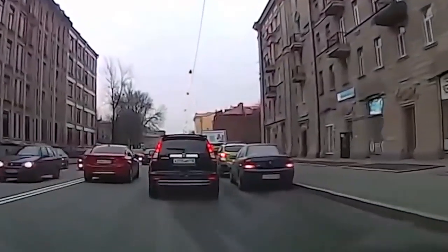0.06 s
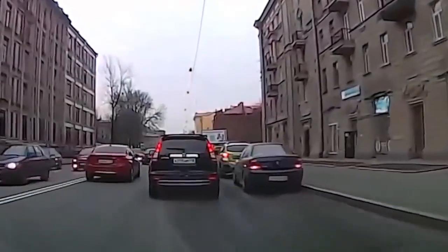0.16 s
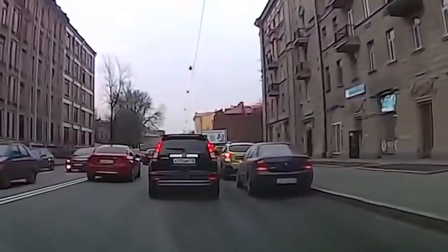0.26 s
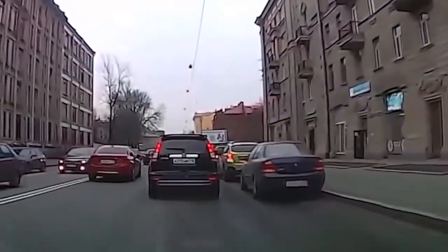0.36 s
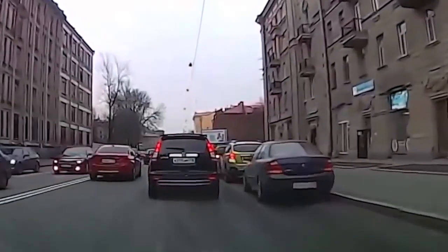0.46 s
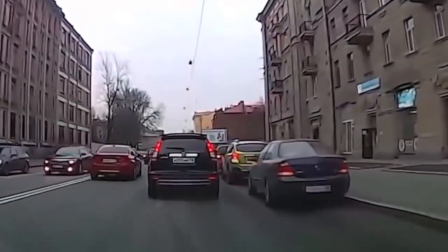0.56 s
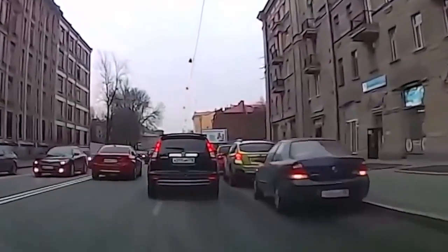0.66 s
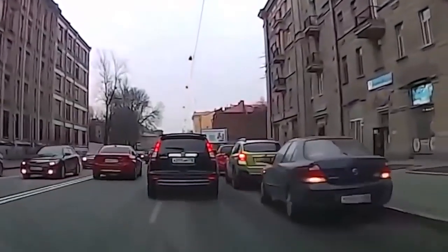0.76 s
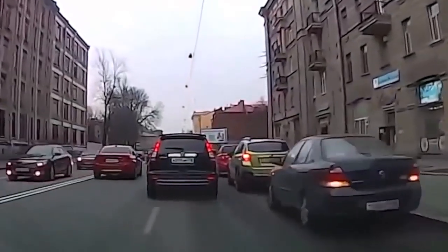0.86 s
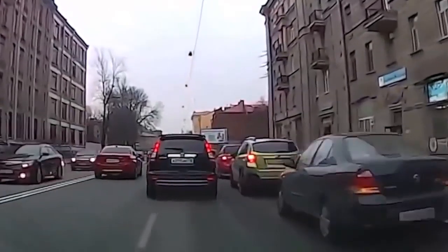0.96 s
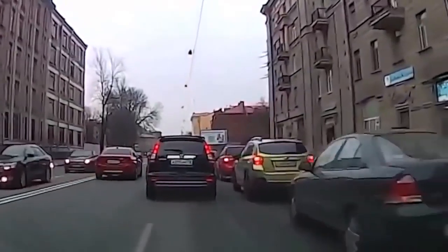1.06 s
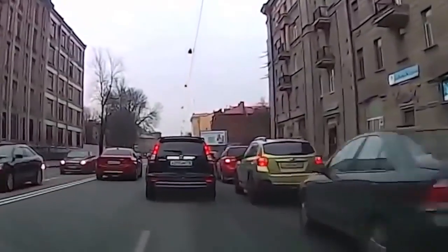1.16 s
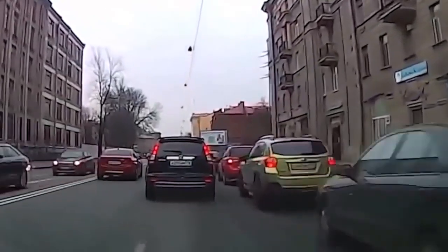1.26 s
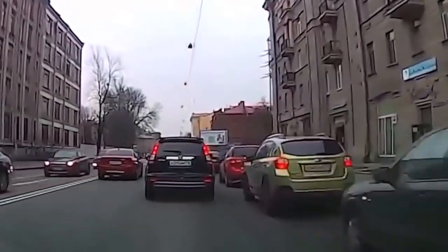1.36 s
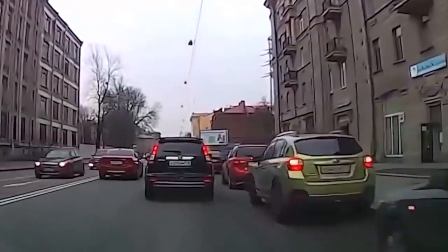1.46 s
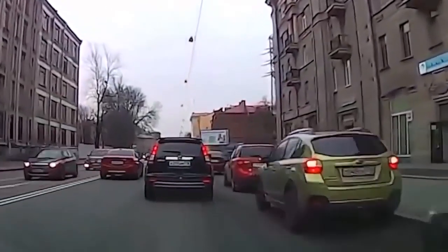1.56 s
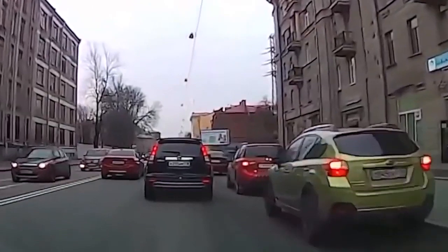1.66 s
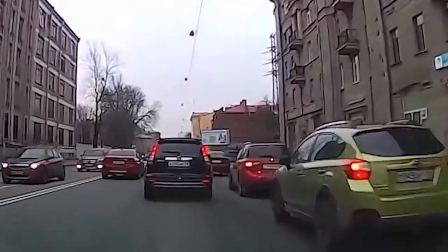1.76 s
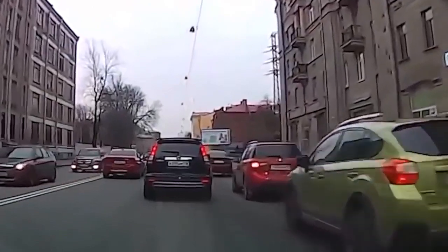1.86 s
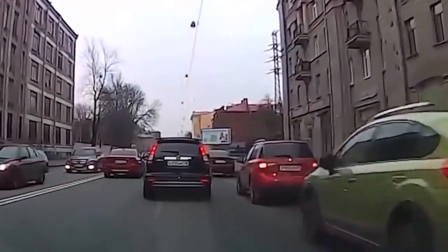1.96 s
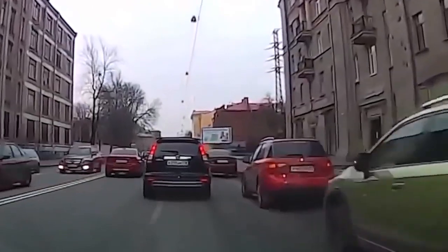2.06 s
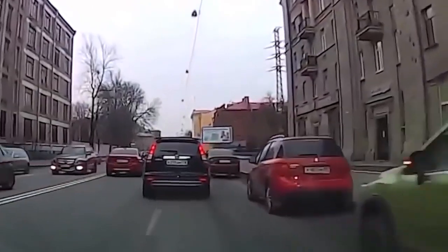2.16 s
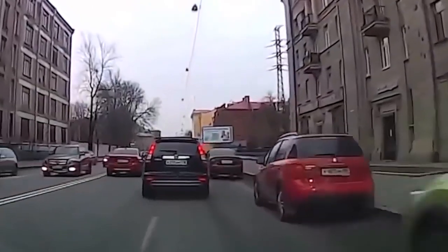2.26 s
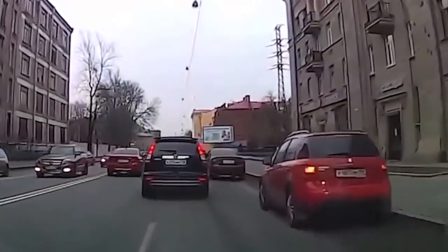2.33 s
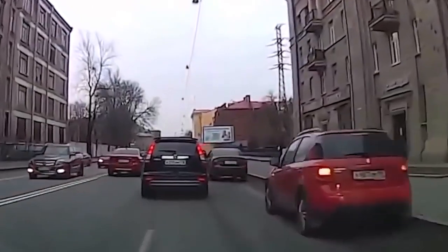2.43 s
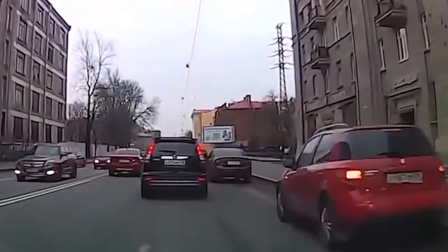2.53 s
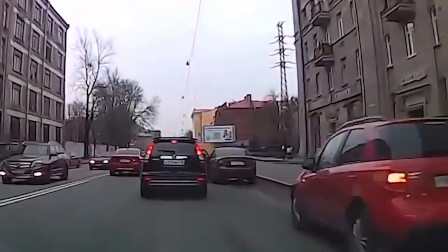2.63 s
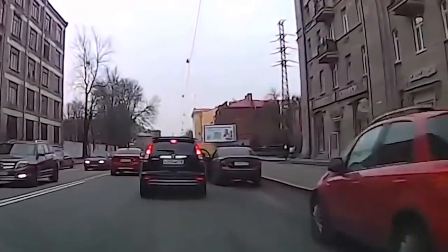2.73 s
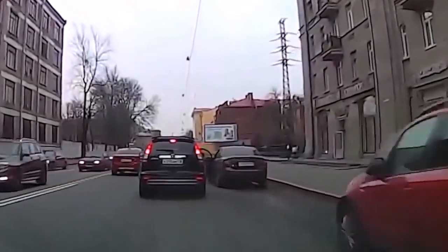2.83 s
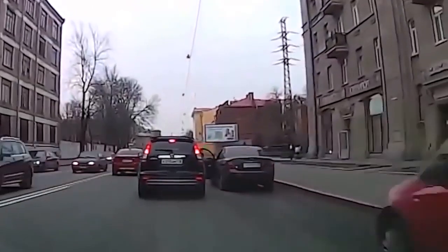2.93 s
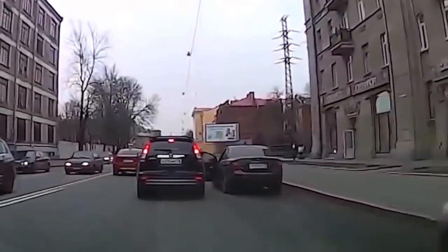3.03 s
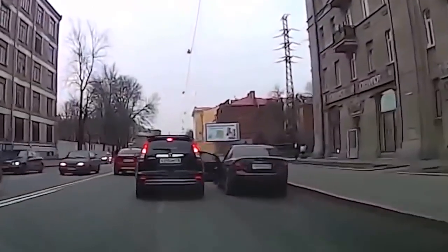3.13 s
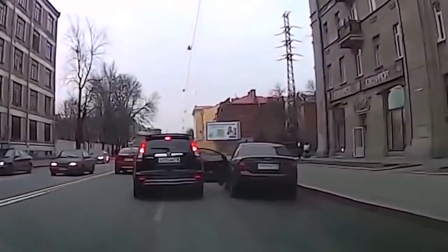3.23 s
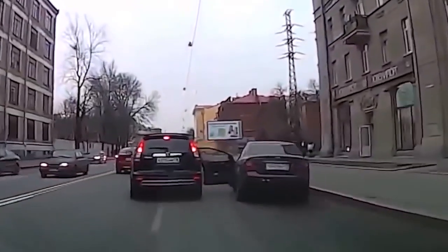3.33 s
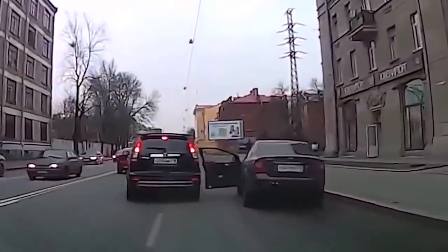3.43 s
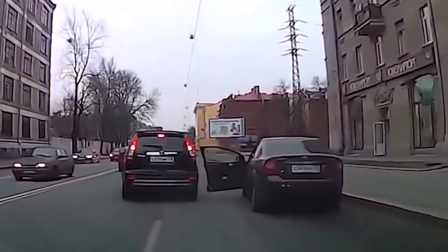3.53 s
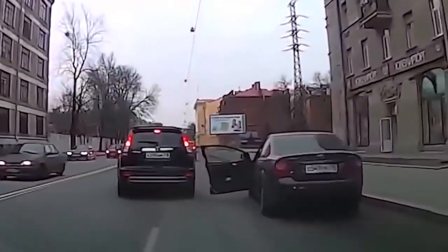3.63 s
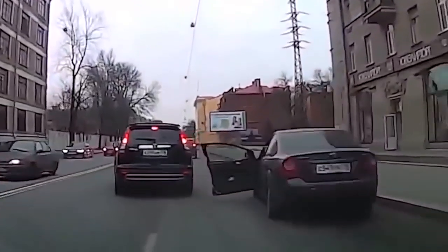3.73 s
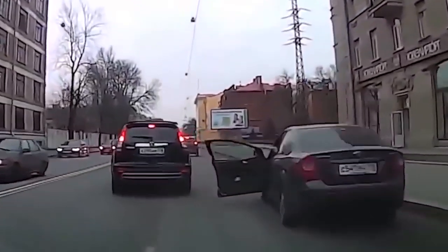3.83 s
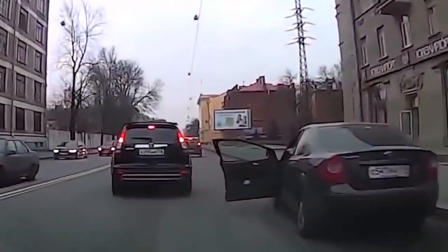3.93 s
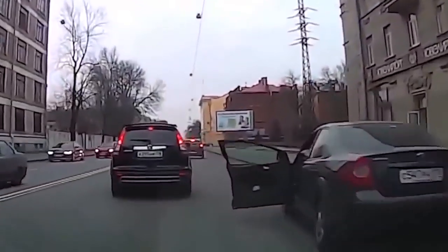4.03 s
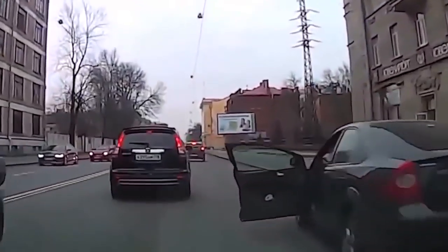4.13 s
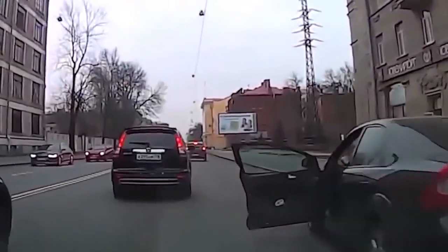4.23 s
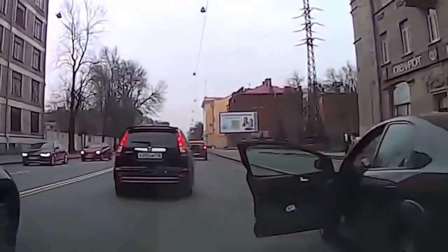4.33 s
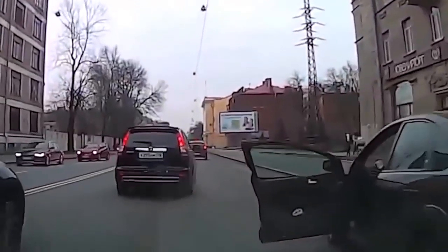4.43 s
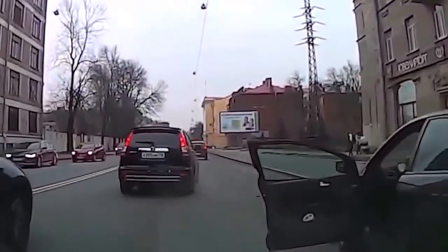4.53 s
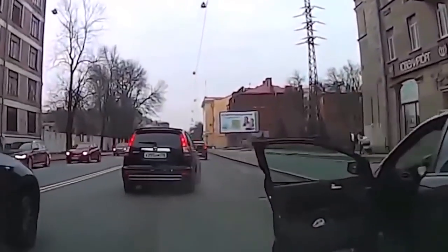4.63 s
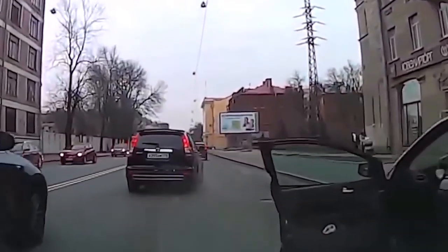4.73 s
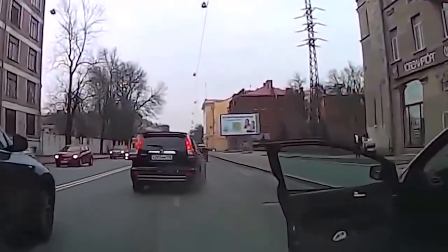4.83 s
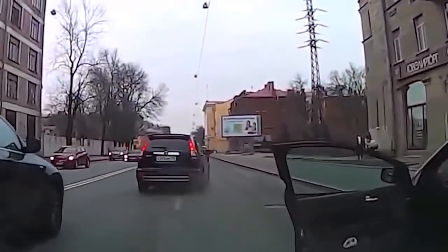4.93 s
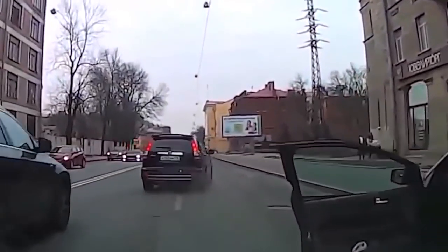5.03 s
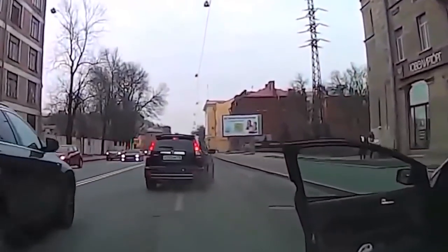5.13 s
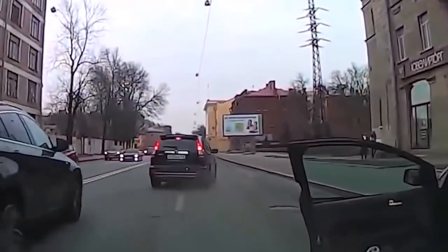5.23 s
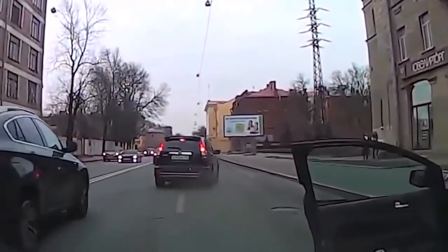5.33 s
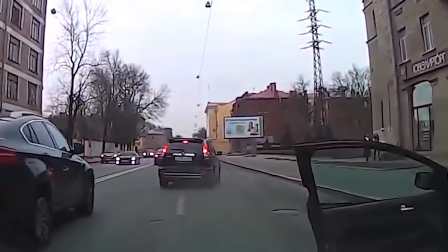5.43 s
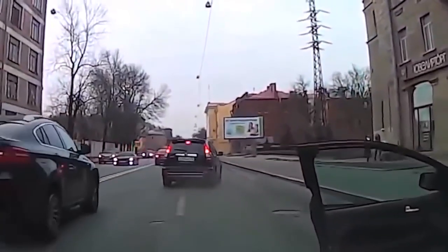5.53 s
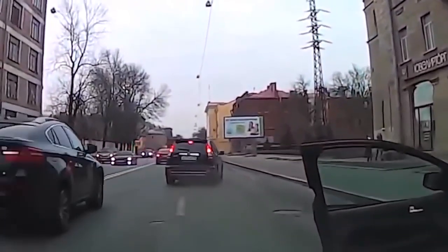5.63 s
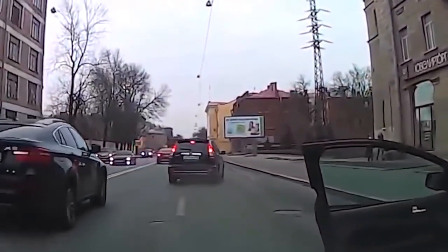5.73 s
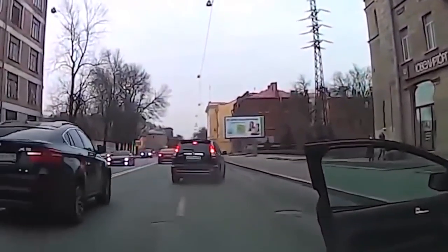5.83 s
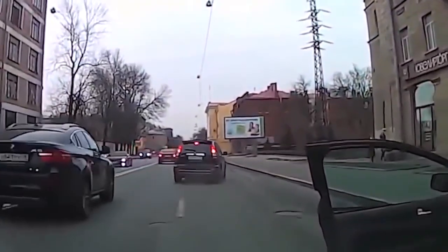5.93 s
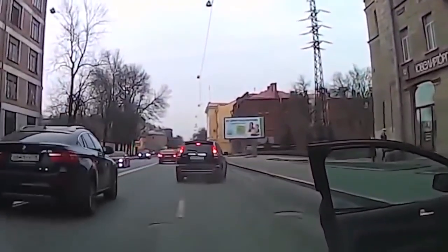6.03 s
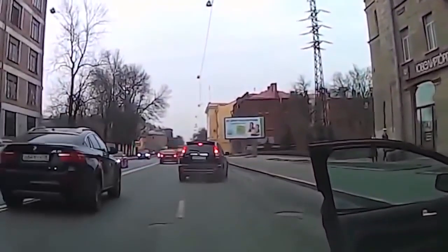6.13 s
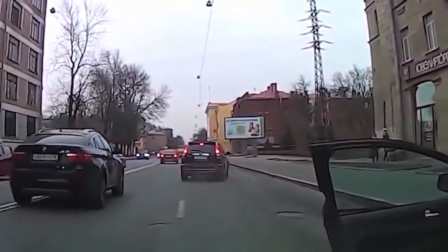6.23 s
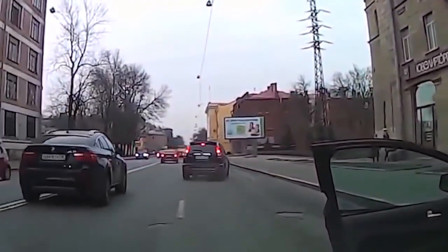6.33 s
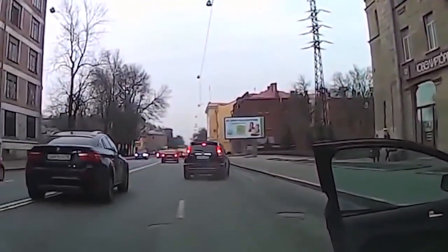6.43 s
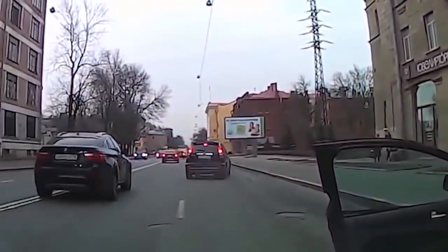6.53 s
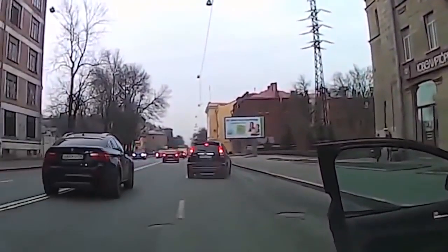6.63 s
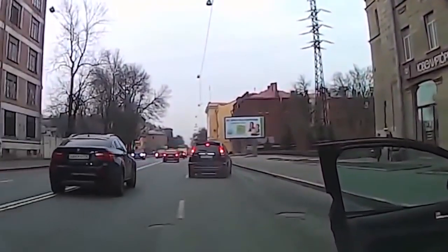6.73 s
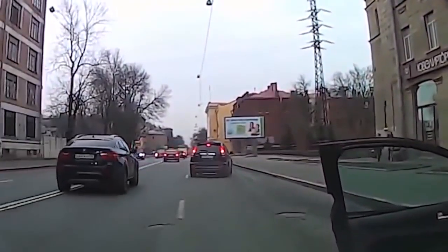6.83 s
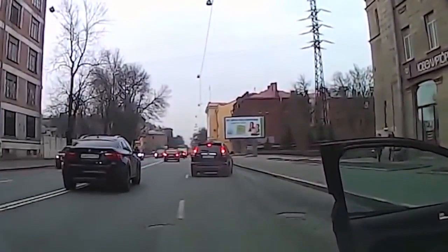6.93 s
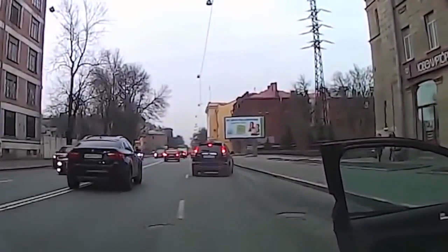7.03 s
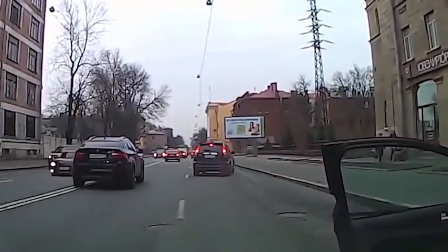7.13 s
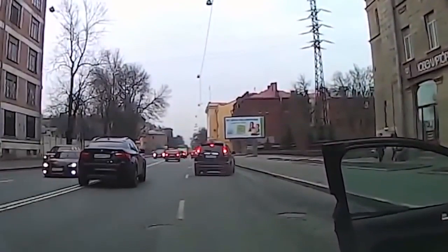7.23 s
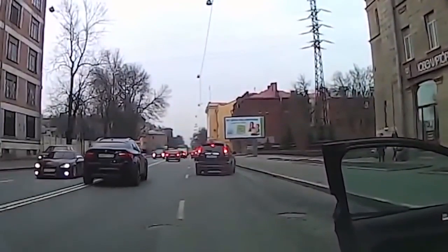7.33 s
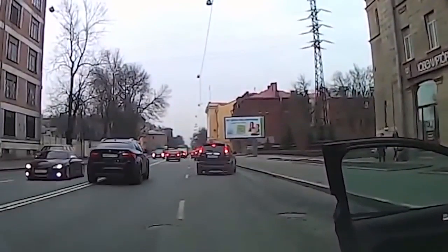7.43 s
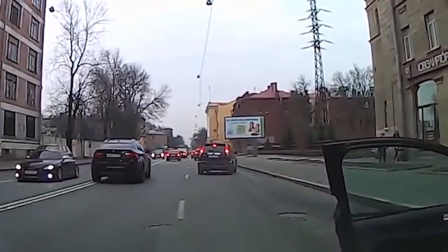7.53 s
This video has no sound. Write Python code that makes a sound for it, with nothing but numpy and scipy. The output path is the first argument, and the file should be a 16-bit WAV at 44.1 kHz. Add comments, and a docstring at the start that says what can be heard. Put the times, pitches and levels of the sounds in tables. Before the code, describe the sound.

Tyres rumble and an engine drones low inside a car on a city street, heard from a microphone at the windscreen. The brake goes down with a short whoosh and a plastic snap, then the car hits a parked car's open door with a crack and a sharp, crunching bang. The door edge scrapes along the bodywork as the brakes hum. Suspension knocks and trim ticks follow while the car slows, leaving soft ventilation.

```python
"""Inside a car on a city street, one microphone at the windscreen. Tyres rumble and the engine drones.
At 3.3 s the brake goes down with a whoosh; at 3.7 s the front wing hits the open door of a parked car:
a crack, a bang, then the door edge sticks and slips along the bodywork while the braked wheels hum.
The body shudders, the suspension knocks and loose trim ticks as the car slows to a halt.
Around 6.5 s another car passes the side window, over the steady rush of the ventilation."""
import sys
import numpy as np
from scipy import signal
from scipy.fft import rfft, irfft, next_fast_len
from scipy.io import wavfile
from scipy.ndimage import uniform_filter1d

SR = 44100
rng = np.random.default_rng(int(sys.argv[2]) if len(sys.argv) > 2 else 0)


def store_pcm(level_fs):
    """Save levels as 16-bit WAV."""
    pcm = np.round(np.clip(level_fs, -1, 1) * 32767).astype(np.int16)
    wavfile.write(sys.argv[1], SR, np.atleast_2d(pcm).T)


N = 334133
TIME = np.arange(N) / SR
DRAG_S, CATCH_S, DRAG_END_S = 3.83, 4.035, 4.51   # the door edge drags, catches hard, comes free


def collision():
    """Door on the front wing: each blow is three quick contacts that ring panels and crush plastic."""
    # t/s, thud/dB, crunch/dB, crunch brightness/Hz, rebound gap/s, loss per rebound/dB
    blows = [(3.7243, -28, -23.5, 1394, .004, 4), (3.7315, -12.5, -14, 1000, .0075, 1),
             (3.7878, -36, -19.5, 8920, .005, 2), (3.8011, -0.5, -9, 2100, .0089, 11),
             (3.84, -29, -33, 4100, .008, 7.5), (3.881, -54, -39.5, 3500, .008, -2.5),
             (3.970, -34, -32, 2200, .006, 5), (3.997, -34, -23, 4500, .005, 8),
             (4.027, -21.5, -24, 4800, .0055, 2), (4.052, -20.5, -26, 2970, .008, 14),
             (4.091, -22.5, -29, 1490, .011, 2.5), (4.238, -36.5, -34, 1550, .008, 3)]
    # modes of the struck wing and door: f/Hz, level/dB, t60/s
    panels = [(217, -11.5, 0.041), (348.4, -2, 0.057), (443.5, -3.5, 0.046), (600, -20, .04),
              (860, -26.5, 0.048), (1167, -12.5, 0.042), (1566, -13, 0.031), (1637, -17, 0.055)]
    # spectrum of crushed plastic and paint: f/Hz, level/dB
    crunch = [(200, -17), (400, -11), (500, 3), (610, 16), (750, -4), (930, 6), (1080, 2), (1230, 6),
              (1420, 2), (1650, 5), (2100, -10), (2800, -3.5), (4600, -14), (8500, -24), (10500, -45)]
    thuds, showers = [], []
    for s, thud_db, crunch_db, bright_hz, gap, loss_db in blows:
        for k in range(3):
            thuds.append((s + k * gap, thud_db - k * loss_db))
            showers.append((s + k * gap, crunch_db - k * loss_db, 0.0048, bright_hz))
    bang = strike(*np.transpose(thuds), panels, contact_hz=890)
    return bang + crackle(showers, crunch, grain_db=2, rise_s=0.0005)


def scrape():
    """The door edge sticks and slips along the bodywork, shakes it and makes the sheet metal sing."""
    # spectra of the four friction bands, low to high: f/Hz, level/dB
    shudder_band = [(15, -59.5), (40, 8.5), (75, 14), (100, 14), (122, 18.5), (140, 18), (170, 9),
                    (280, -60.5)]
    groan_band = [(120, -17), (190, 6), (235, 7.5), (290, 0), (345, 1), (420, -0.5), (490, -11), (570, -3),
                  (720, -25.5), (1100, -60.5)]
    grind_band = [(500, -29.5), (800, 5.5), (950, 1.5), (1150, 3.5), (1400, 2), (1680, 2.5), (1900, -1.5),
                  (2300, -19), (3200, -89)]
    grit_band = [(1600, 5), (2400, -1.5), (2800, 2.5), (3300, -9.5), (4100, -8), (4800, -23), (5600, -13.5),
                 (7000, -22.5), (8800, -27.5), (10000, -52)]
    # sheet-metal modes: f/Hz, level/dB, t60/s
    sheet_modes = [(925, 8, 0.44), (926, -11, 0.39), (1549, -16, 0.4), (1660, -3.5, 0.027),
                   (2077, -0.5, 0.24), (2180, -12, 0.18), (2740, -0.5, 0.13), (2996, -25.5, .12)]
    age = since(DRAG_S)
    build_s, ease_s = 0.071, 0.065   # pressure builds up to the catch, then eases
    press_db = 13.5 * np.exp(-np.maximum(CATCH_S - TIME, 0) / build_s - since(CATCH_S) / ease_s)
    grind_db = press_db - 9 * age
    clump_db = 3.1 * drift(60)   # the edge grips and lets go, so the bright grains come in clumps
    onset = np.minimum(age / 0.15, 1)
    shudder = from_db(-35 + press_db) * onset * slips(shudder_band, per_s=1300, spread_db=1)
    groan = from_db(-41.5 + press_db) * slips(groan_band, per_s=1200, spread_db=-1.5)
    grind = from_db(-45 + grind_db + clump_db) * slips(grind_band, per_s=1900, spread_db=-0.5)
    singing = from_db(-49 + grind_db) * rms_one(ring(rng.standard_normal(N), sheet_modes))
    grit = from_db(-35 - 48.5 * age + clump_db) * slips(grit_band, per_s=1300, spread_db=5.5)
    return (shudder + groan + grind + singing + grit) * during(DRAG_S, DRAG_END_S, rise=0.11, fall=0.059)


def brake_servo():
    """Air rushes into the servo as the pedal goes down, then dies to a faint leak until the crash."""
    # spectrum of the rushing air: f/Hz, level/dB
    whoosh = [(150, 4.5), (400, -0.5), (530, 8), (600, -8), (700, 4), (900, -10.5), (1400, -10), (1620, 3),
              (1900, -15), (2200, -12.5), (2800, -6.5), (3400, -13), (4100, -21.5), (4900, -59)]
    pressed_s, hold_s, fall_db_per_s, leak_db = 3.288, 0.02, 150, -54.5
    flow = from_db(-31 - fall_db_per_s * since(pressed_s + hold_s)) + from_db(leak_db)
    return flow * during(pressed_s, 3.71, rise=0.028, fall=0.02) * slips(whoosh, per_s=1500, spread_db=0)


def brake_hum():
    """Hard-braked wheels hum in surges, sinking in pitch and growing purer as they slow."""
    # the brakes bite: t/s, level/dB, half length/s
    bites = [(4.035, -21, 0.021), (4.12, -27, 0.021), (4.24, -29, 0.055), (4.375, -29, 0.089),
             (4.6, -38, .07), (4.85, -43, 0.067), (5.22, -43, 0.19)]
    age = since(DRAG_S)
    hz = (129.2 - 20.5 * age) * (1 + 0.0249 * drift(30))
    phase = 2 * np.pi * np.cumsum(hz) / SR
    octave = from_db(-5 - 6 * age) * np.sin(2 * phase)
    return swells(bites) * from_db(2.5 * drift(25)) * (np.sin(phase) + octave)


def suspension():
    """Under the floor, each knock rings a low thump and a higher clunk."""
    # t/s, thump/dB, clunk/dB
    knocks = [(1.205, -31, -48), (2.034, -36, -30.5), (3.4823, -45.5, -26.5), (4.356, -26, -29),
              (4.486, -23, -30), (4.718, -32, -37), (4.754, -26, -48), (5.132, -29.5, -50),
              (6.385, -31, -56), (6.457, -27, -30), (6.545, -38, -48)]
    # suspension resonances: f/Hz, level/dB, t60/s
    thump = [(91, -15, 0.24), (104.5, -3, 0.11)]
    clunk = [(420, -9, 0.043), (573, -3, 0.035), (632, -4, 0.14), (1000, -12, 0.017)]
    s, thump_db, clunk_db = np.transpose(knocks)
    return strike(s, thump_db, thump, contact_hz=300) + strike(s, clunk_db, clunk, contact_hz=706)


def fitting():
    """A hard plastic fitting snaps as the car dives."""
    # contacts: t/s, level/dB
    snaps = [(3.5562, -22), (3.5595, -34), (3.5625, -38)]
    # modes of the fitting: f/Hz, level/dB, t60/s
    modes = [(530, -4.5, 0.049), (940, -1.5, 0.031), (1530, -16, 0.039), (2410, -4, 0.011),
             (2670, -7, 0.022), (3140, -36, 0.024), (3870, -40, 0.022), (5750, -13, 0.011)]
    return muffle(strike(*np.transpose(snaps), modes, contact_hz=4340), hz=5870)


def trim():
    """Trim near the microphone ticks; shaken loose by the crash, it rattles until the body is still."""
    # single ticks: t/s, level/dB
    ticks = [(1.6731, -39.5), (1.7738, -41), (2.5356, -37), (4.2737, -38.5), (4.379, -37), (4.7134, -35),
             (4.781, -38), (4.874, -43), (5.0569, -39), (5.1203, -42), (5.2984, -43.5), (5.543, -41),
             (5.7018, -43), (5.8144, -37.5), (6.116, -41.5), (6.3462, -43.5), (7.39, -42)]
    # spectrum of the loose trim: f/Hz, level/dB
    spectrum = [(300, -12), (550, -3.5), (900, -2.5), (1250, 3.5), (1650, 4.5), (2100, -7.5), (2700, -2.5),
                (3400, -21.5), (4400, -36), (6000, -25.5), (9000, -47)]
    showers = [(s - 0.002, db + 1, 0.008, 9000) for s, db in ticks]
    ticking = crackle(showers, spectrum, grain_db=2, rise_s=0.0044)
    shaking = from_db(-53 - 11.5 * since(CATCH_S)) + from_db(-66.5)
    shaking *= during(CATCH_S, 6.8, rise=0.2, fall=0.44) * from_db(3.2 * drift(45))
    return ticking + shaking * slips(spectrum, per_s=1500, spread_db=0)


def jingles():
    """Small metal parts chatter briefly on one resonance each."""
    # t/s, level/dB, f/Hz, rise and decay time/s
    parts = [(3.522, -48.5, 3140, 0.012), (4.05, -38, 3300, 0.0031), (4.355, -66, 4100, 0.034),
             (4.82, -67, 4040, .011), (4.955, -66.5, 4100, 0.016), (5.431, -69.5, 4160, 0.023),
             (5.52, -65, 3460, 0.016), (6.085, -75, 4200, 0.0081), (6.359, -60.5, 3200, 0.014),
             (6.369, -68, 5600, 0.016)]
    out = np.zeros(N)
    for s, db, hz, decay in parts:
        age = since(s) / decay
        contacts = rng.standard_normal(N) * from_db(6.5 * drift(120))
        chatter = ring(ring(contacts, [(hz, 0, 0.003)]), [(hz, 0, 0.005)])
        out += from_db(db) * rms_one(chatter) * age * np.exp(1 - np.minimum(age, 50))
    return out


def road():
    """Tyres on asphalt through the body: three bands follow the speed; the low two swell as it heaves."""
    # t/s, share of cruising speed
    journey = [(0, 0.94), (.9, 0.84), (1.6, 0.92), (3.2, 1.04), (3.8, 0.97), (4.6, 0.51), (5.0, 0.35),
               (5.45, 0.28), (6.1, .05), (7.57, .025)]
    # the body heaves on its springs: t/s, rumble/dB, roar/dB, half length/s
    heaves = [(1.215, -39, -36.5, 0.021), (2.02, -46, -38.5, 0.035), (4.497, -30, -35, 0.022),
              (4.743, -36.5, -43, 0.056), (5.19, -43.5, -49, .05), (5.592, -60, -53, 0.045),
              (5.91, -56.5, -61, 0.032), (6.584, -53.5, -58.5, 0.1), (6.873, -58.5, -56, 0.072),
              (7.2, -64.5, -70.5, 0.017), (7.55, -65.5, -63.5, .035)]
    # spectra of the tyre bands, low to high: f/Hz, level/dB
    rumble_band = [(15, -20.5), (30, 1), (58, 4), (85, 7), (125, 9), (155, 0.5), (200, -4), (320, -60.5)]
    roar_band = [(110, -24.5), (160, -2.5), (195, 2.5), (270, -2.5), (350, -1.5), (480, -10), (590, -5.5),
                 (720, -19), (1100, -68)]
    rush_band = [(450, -15.5), (700, -2), (860, 5), (1200, 0.5), (1400, -1.5), (1680, -4), (2100, -20),
                 (2700, -13.5), (3400, -31), (4500, -85)]
    doublings = np.log2(in_time(journey))
    s, rumble_db, roar_db, half = np.transpose(heaves)
    rumble = np.hypot(from_db(-42.5 + 6.5 * doublings), swells(zip(s, rumble_db, half)))
    roar = np.hypot(from_db(-40 + 11.5 * doublings), swells(zip(s, roar_db, half)))
    rush = from_db(-47.5 + 4.5 * doublings)
    return (rumble * noise(rumble_band, flutter_db=2.5, rate=14)
            + roar * noise(roar_band, flutter_db=1.5, rate=30)
            + rush * noise(rush_band, flutter_db=1, rate=35))


def engine():
    """Wavering low tones from under the bonnet die away once the foot leaves the throttle."""
    # engine and drive-line tones: f/Hz, level/dB
    drone = [(58, -52.5), (114, -63.5), (193, -50.5)]
    throttle_off_s, fall_db_per_s = 3.4, 21
    tones = np.zeros(N)
    for hz, db in drone:
        level = from_db(db + 3.8 * drift(4.2))
        wavering_hz = hz * (1 + 0.0253 * drift(4))
        tones += level * np.sin(2 * np.pi * np.cumsum(wavering_hz) / SR)
    return from_db(-fall_db_per_s * since(throttle_off_s)) * tones


def overtaking():
    """Tyre noise of a car one lane away swells as it draws level, then fades."""
    # its spectrum through the side window: f/Hz, level/dB
    tyres = [(300, -25), (550, -4.5), (780, 14), (1100, 3.5), (1600, -3.5), (2100, -9.5), (2900, -9),
             (3700, -33), (5000, -34)]
    nearest_s, half_s = 6.51, 0.5
    nearness = 1 / (1 + ((TIME - nearest_s) / half_s) ** 2)
    return from_db(-58) * nearness * noise(tyres, flutter_db=1.5, rate=31)


def ventilation():
    """Air rushes from the vents, its level shifting slowly."""
    # airflow: t/s, level/dB
    air = [(0, -54.5), (4.5, -53.5), (5.3, -56), (6.2, -51.5), (7.57, -53.5)]
    # spectrum of the fan: f/Hz, level/dB
    fan = [(30, -5), (130, -25.5), (200, -17.5), (250, 4.5), (340, 2), (440, 4), (600, 6), (730, -4),
           (900, 6), (1650, 3.5), (2050, -14), (2500, 3), (2850, -9), (3400, -20), (4200, -51)]
    return from_db(in_time(air)) * colour(rng.standard_normal(N), fan)


def hiss():
    """Faint microphone hiss pulses quickly, less deeply after the crash."""
    # spectrum of the hiss: f/Hz, level/dB
    spectrum = [(3500, 0), (4800, -21), (5500, -1.5), (6200, 4), (6900, -6), (7600, -3.5), (8300, 5.5),
                (9300, -3), (10200, -35.5), (11100, -1.5), (11800, -32), (13000, -16.5)]
    # one brief swell: t/s, level/dB, half length/s
    swell = [(3.15, -70, 0.28)]
    pulse_hz = 28.5
    depth = np.interp(TIME, [DRAG_S, DRAG_END_S], [0.23, 0.1])
    pulsing = 1 + depth * np.tanh(3 * np.cos(2 * np.pi * pulse_hz * (TIME - 0.02)))
    return np.hypot(from_db(-68), swells(swell)) * colour(rng.standard_normal(N), spectrum) * pulsing


def cabin(x, t60, wet_db):
    """Glass and dashboard close to the microphone return a short, dull tail."""
    age = TIME[:SR // 4]
    tail = lowpass(rng.standard_normal(len(age)), 3000) * from_db(-60 * age / t60) * (age > 0.004)
    return x + from_db(wet_db) * signal.fftconvolve(x, tail / np.linalg.norm(tail))[:N]


def muffle(x, hz):
    """Steep low-pass that dulls the top of the knocks, snaps and scrape."""
    return signal.sosfilt(signal.butter(8, hz, fs=SR, output="sos"), x)


def strike(times, levels_db, modes, contact_hz):
    """Soft contacts set the modes ringing."""
    clicks = np.full(N, 1e-18)
    clicks[np.round(times * SR).astype(int)] = from_db(levels_db)
    return ring(lowpass(lowpass(clicks, contact_hz), contact_hz), modes)


def ring(x, modes):
    """Damped resonances (f/Hz, level/dB, t60/s); a unit click starts each at its own level."""
    out = 0
    for hz, db, t60 in modes:
        radius, angle = from_db(-60 / (t60 * SR)), 2 * np.pi * hz / SR
        feedback = [1, -2 * radius * np.cos(angle), radius ** 2]
        out = out + from_db(db) * signal.lfilter([0.5, 0, -0.5], feedback, x + 1e-18)
    return out


def crackle(rows, spectrum, grain_db, rise_s):
    """Each row (t/s, level/dB, decay/s, brightness/Hz) is a quickly dying shower of tiny contacts."""
    out, age = np.zeros(N + SR), TIME[:SR // 10]
    size = len(age)
    for s, db, decay, bright_hz in rows:
        grains = rng.standard_normal(size)
        grains *= from_db(grain_db * np.repeat(rng.standard_normal(size), SR // 2000)[:size])
        fade = np.exp(-age / decay) * (1 - np.exp(-age / rise_s))
        shower = rms_one(grains * fade) * np.sqrt(np.mean(fade ** 2))
        at = round(s * SR)
        out[at:at + size] += from_db(db) * lowpass(shower, bright_hz)
    return colour(out[:N], spectrum)


def slips(spectrum, per_s, spread_db):
    """Dense random clicks, as of stick-slip, their sizes scattered by spread_db; rms 1."""
    sizes = from_db(spread_db * np.minimum(rng.exponential(1, N), 3)) * rng.choice([-1, 1], N)
    return rms_one(colour(sizes * (rng.random(N) < per_s / SR), spectrum))


def noise(spectrum, flutter_db, rate):
    """Coloured noise whose level flutters; rms 1."""
    return rms_one(colour(rng.standard_normal(N), spectrum) * from_db(flutter_db * drift(rate)))


def colour(x, spectrum):
    """Causal (minimum-phase) filter with the given spectrum; white noise keeps its power."""
    size = 2 * next_fast_len(N // 2 + SR // 10)
    hz, db = np.transpose(spectrum)
    bin_hz = np.arange(size // 2 + 1) * SR / size
    gain = rms_one(from_db(np.interp(np.log(bin_hz + 1), np.log(hz), db)))
    cepstrum = irfft(np.log(gain))
    cepstrum[1:size // 2] *= 2
    cepstrum[size // 2 + 1:] = 0
    return irfft(rfft(x, size) * np.exp(rfft(cepstrum)))[:N]


def lowpass(x, hz):
    """One-pole softening."""
    pole = np.exp(-2 * np.pi * hz / SR)
    return signal.lfilter([1 - pole], [1, -pole], x)


def drift(rate):
    """Random wander through `rate` points a second; rms 1."""
    knots = rng.standard_normal(2000)
    return rms_one(np.interp(TIME * rate, np.arange(len(knots)), knots))


def swells(rows):
    """Gain with one bell-shaped swell per row (t/s, level/dB, half length/s)."""
    return sum(from_db(db) * np.exp(-np.minimum(((TIME - s) / half) ** 2, 50)) for s, db, half in rows)


def during(start, end, rise, fall):
    """Open from start to end, fading in before and out after; all in seconds."""
    return np.interp(TIME, [start - rise, start, end, end + fall], [0, 1, 1, 0])


def since(s):
    """Seconds gone by since a moment; zero before it."""
    return np.maximum(TIME - s, 0)


def in_time(rows):
    """Rows (t/s, value) joined by straight lines."""
    return np.interp(TIME, *np.transpose(rows))


def from_db(db):
    """Decibels to gain."""
    return 10 ** (np.asarray(db) / 20)


def rms_one(x):
    """Scale to unit power."""
    return x / np.sqrt(np.mean(x ** 2) + 1e-20)


def suppressor(x, strength, depth_db):
    """Spectral subtraction: cells near the quietest steady level of their frequency are turned down."""
    _, _, cells = signal.stft(x, nperseg=1024, noverlap=768)
    power = np.abs(cells) ** 2 + 1e-24
    steady = uniform_filter1d(uniform_filter1d(power, size=90, axis=-1), size=5, axis=-2)
    floor = steady.min(axis=-1, keepdims=True)
    local = uniform_filter1d(uniform_filter1d(power, size=3, axis=-1), size=3, axis=-2)
    gain = np.maximum(1 - strength * floor / np.maximum(local, 1e-24), from_db(depth_db))
    return signal.istft(cells * gain, nperseg=1024, noverlap=768)[1][:, :N]


def scene():
    """All sources as they reach the microphone at the windscreen, in mono."""
    background = ventilation() + hiss()
    impacts = cabin(collision() + suspension() + fitting() + trim() + jingles(), t60=0.058, wet_db=-15.5)
    driving = road() + overtaking() + engine() + brake_servo() + brake_hum()
    return (muffle(impacts + scrape(), hz=9400) + driving + background)[None]


def record(dry):
    """The recorder rounds the peaks, suppresses steady noise and cuts the top."""
    rounded = 1.198 * np.tanh(dry / 1.216)
    quietened = suppressor(rounded, strength=0.65, depth_db=-12)
    return signal.sosfilt(signal.cheby2(12, 70, 12700, fs=SR, output="sos"), quietened)


dry = scene()
out = record(dry)
store_pcm(out)
```